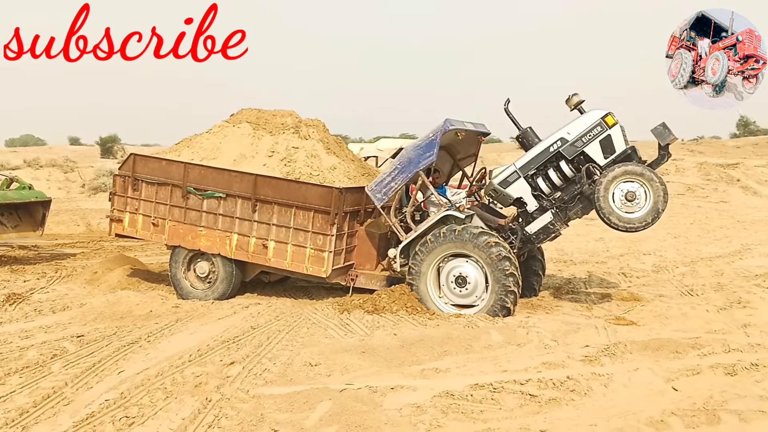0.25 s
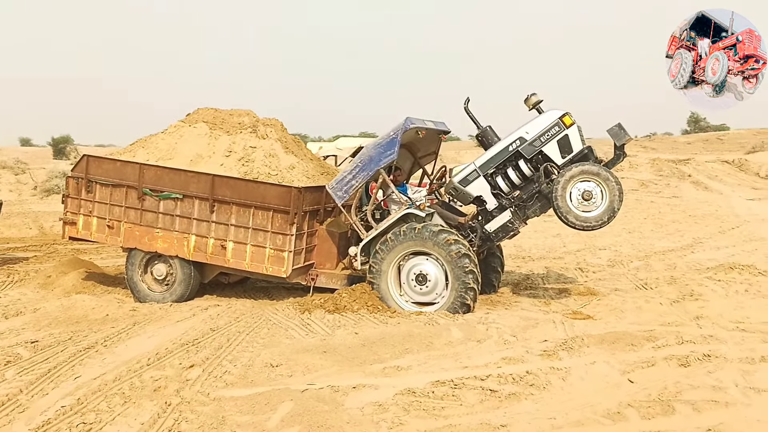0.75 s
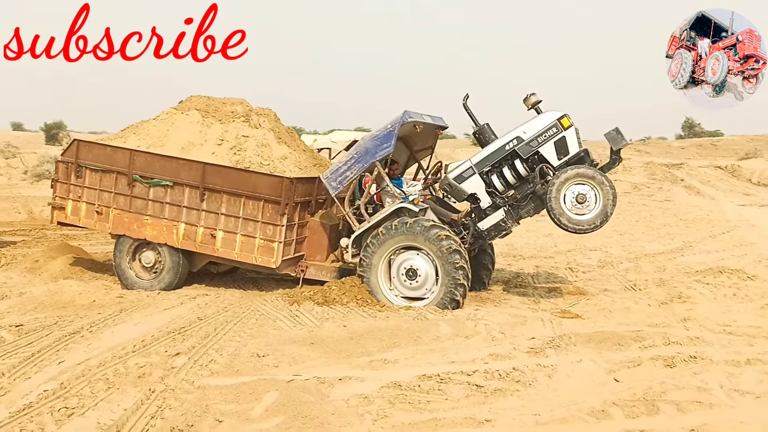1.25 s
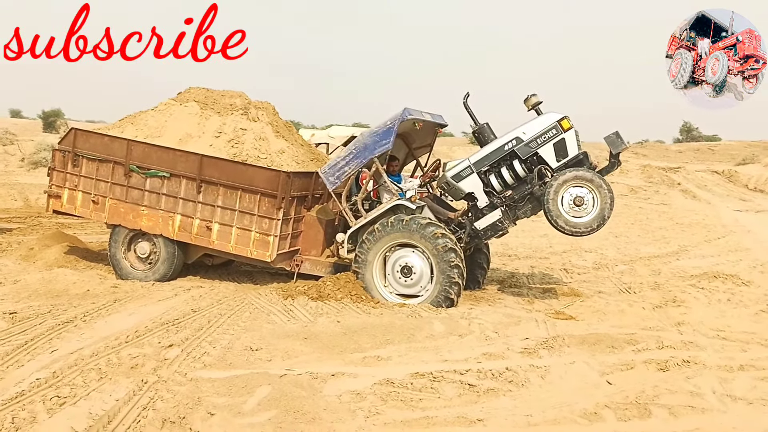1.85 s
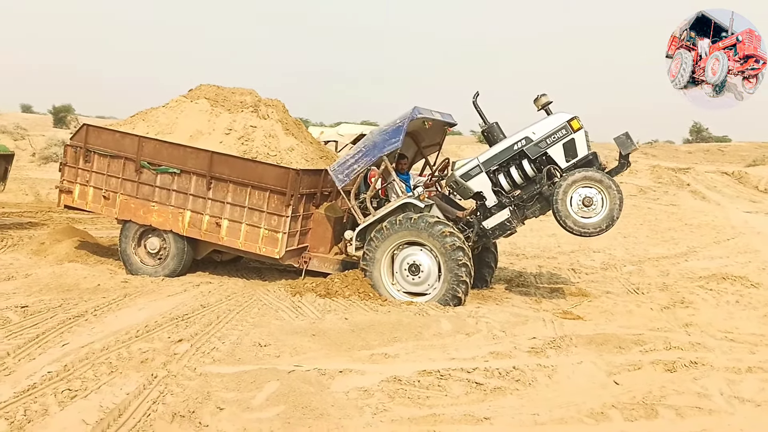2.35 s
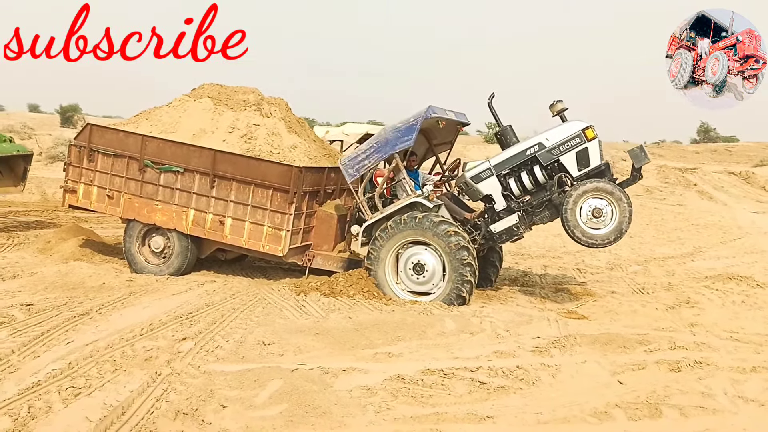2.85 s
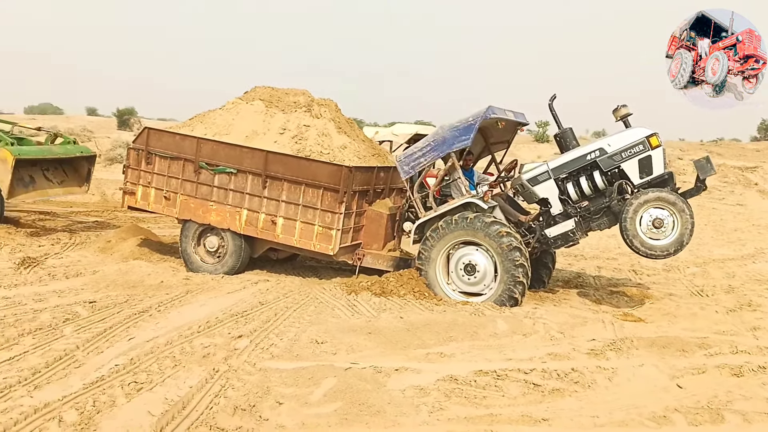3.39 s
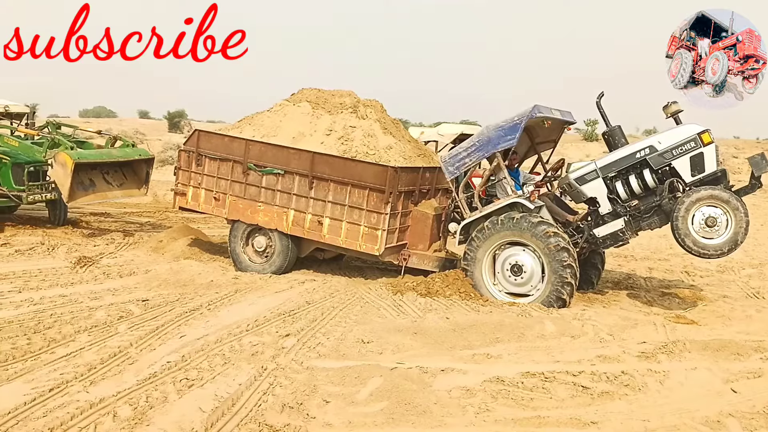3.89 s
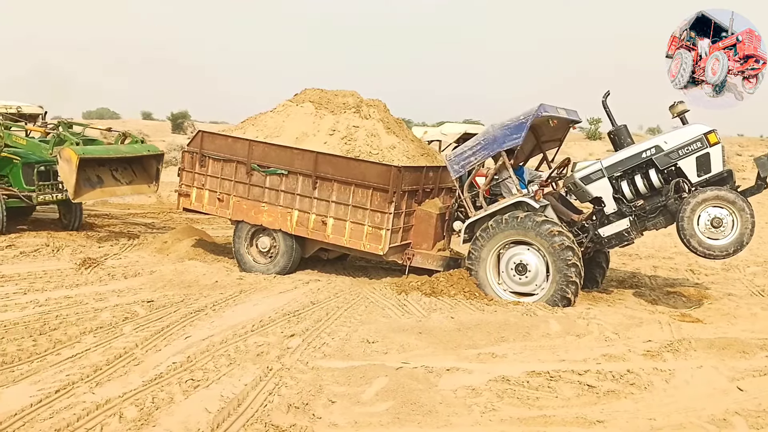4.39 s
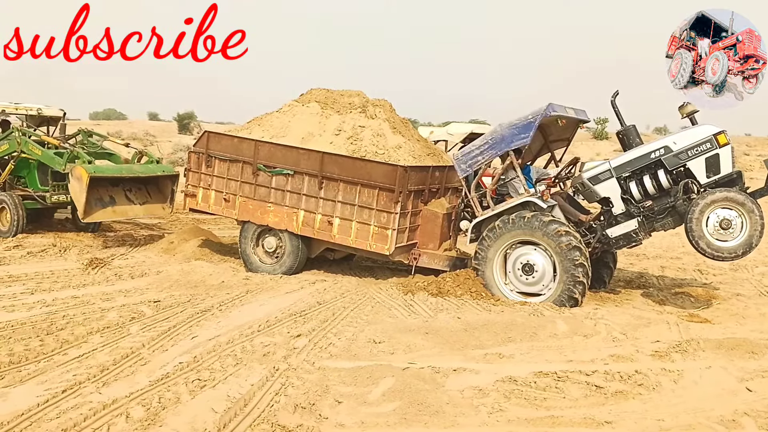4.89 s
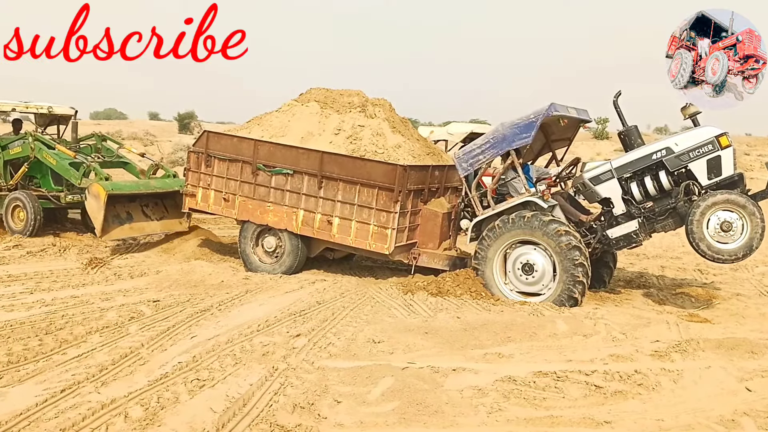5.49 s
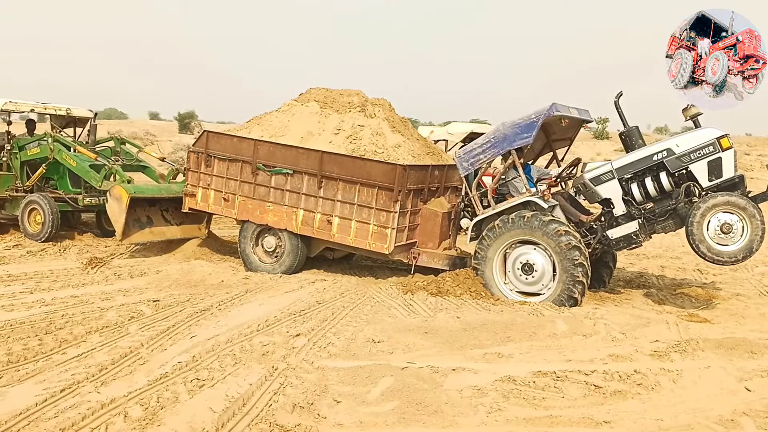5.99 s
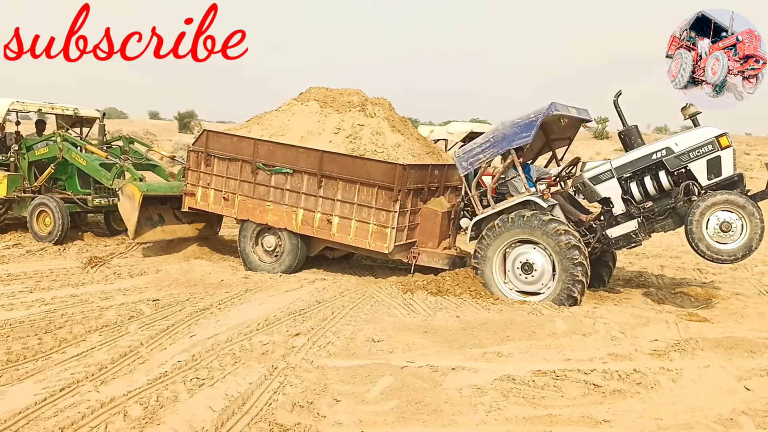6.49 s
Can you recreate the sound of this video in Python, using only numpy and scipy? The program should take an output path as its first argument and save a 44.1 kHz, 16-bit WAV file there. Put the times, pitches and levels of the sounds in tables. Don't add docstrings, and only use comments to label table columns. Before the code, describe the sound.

A diesel tractor hammers flat out in open sand, coasts down in a falling growl, then catches into a knocking idle while another engine drones.

```python
import sys
import numpy as np
from scipy import signal
from scipy.fft import rfft, irfft, next_fast_len
from scipy.io import wavfile
from scipy.ndimage import uniform_filter1d, map_coordinates

SR = 44100
rng = np.random.default_rng(int(sys.argv[2]) if len(sys.argv) > 2 else 0)


def nominal_scale(level):
    x = np.asarray(level, float) / 20
    return 10 ** x


def transcribe(u):
    v = np.clip(np.atleast_2d(u).T, -1, 1)
    q = np.round(v * 32767).astype(np.int16)
    wavfile.write(sys.argv[1], SR, q)


N = 297220
T = np.arange(N) / SR
PADDED = next_fast_len(N, True)
HZ = np.fft.rfftfreq(PADDED, 1 / SR)

# time in seconds, firings per second.
SPEED = [(0, 49.631), (0.35, 49.631), (0.7, 50.093), (1.05, 50.17), (1.42, 50.08), (1.6, 44.59),
         (2, 38.761), (2.4, 30.753), (2.72, 24.006), (2.85, 24.04), (3.15, 24.2), (3.52, 24.225),
         (4, 24.59), (4.3, 24.61), (4.6, 24.49), (4.87, 24.585), (5.4, 24.57), (6.74, 24.47)]
# time in seconds, main hum in Hz, effort in dB.
FAR = [(1.45, 68.8, -78), (1.55, 68.3, -50), (1.95, 66.5, -39), (2.25, 70.8, -37), (2.48, 80.7, -29.5),
       (2.7, 75.6, -42), (2.82, 73.5, -60), (3.6, 68.2, -57.5), (3.8, 67.7, -36), (3.95, 75, -36),
       (4.24, 93.05, -30.5), (4.6, 96.6, -35.5), (4.9, 98, -53), (5.25, 95.4, -36.5), (5.7, 94.45, -37),
       (6, 95.2, -32), (6.3, 96.5, -47), (6.74, 94.8, -40.5)]
# thirds of the main hum, level in dB.
FAR_ORDERS = [(3, 0)]
FAR_SIDE_ORDERS = [(2, 1), (4, -10), (5, 0), (6, -6)]
# frequency in Hz, density in dB per Hz.
WIND = [(15, -23), (40, -10), (70, -2.5), (120, -18), (200, -50)]
RUMBLE = [(15, -40), (25, -41), (81, -3.5), (176, -7.5), (234, -8), (365, -12.5), (440, -8.5), (511, -33),
          (560, -5), (730, -66), (1230, -120)]
ROAR_FAST = [(290, -16), (500, -22.5), (560, -9), (687, 1.5), (892, -5), (1340, -7), (1480, -7.5),
             (2070, -1.5), (2570, -12), (4450, -25), (7380, -22.5), (9310, -33.5), (10000, -30.5),
             (14800, -26), (15900, -40)]
ROAR_SLOW = [(170, -53), (290, -27), (500, -16), (842, 1), (1020, -9.5), (1210, -9), (1590, -12),
             (2010, -6), (3050, -20.5), (3960, -29.5), (6030, -27.5), (7820, -33), (9310, -39.5),
             (11100, -39), (14200, -30.5), (15900, -68)]
SLACK = [(420, -24), (520, -2.5), (600, 1.5), (730, -2.5), (830, -33.5)]
PIPE_BLOWN = [(110, -34), (140, -4), (156, -3.5), (175, -9), (210, -48.5)]
PUFF = [(4000, 1), (6800, 0.5), (8570, -8), (9740, -4.5), (11800, 1), (13000, -2), (14500, 4.5),
        (15400, 3.5), (15900, -20)]
CLATTER_FULL = [(310, -19), (540, -17), (692, -19), (753, -1), (911, -2), (1080, -13), (1330, -25),
                (1630, -36), (2030, -37), (2370, 2), (2570, -32), (3470, -23.5), (4510, -23.5),
                (6000, -0.5), (9000, -64), (11700, -58), (19800, -120)]
CLATTER_IDLE = [(620, -24), (1050, -63), (1190, -17), (1620, -6.5), (1770, 5), (2010, -3), (2770, -34),
                (4120, -40), (5150, -8), (6060, -3), (6690, -13), (9000, -17), (11700, -41), (19800, -120)]
HARSH = [(1100, -20), (1500, -12), (1900, -4), (2300, 0), (2700, -28), (3300, -35)]
# frequency in Hz, gain in dB.
ROAR_NOTCH = [(200, -8), (380, -5), (480, -1), (620, -7), (950, -7), (1300, 0), (2100, -1), (2800, 0)]
# frequency in Hz, gain in dB.
ROAR_NOTCH_FIRED = [(480, 0), (620, -3), (950, -3), (1300, -2.5), (2100, -3), (2600, 0)]
# time in seconds, peak in dB, pitch in Hz.
THUMPS = [(3.775, -28.5, 164), (3.98, -24.5, 146.4), (4.095, -21.5, 145), (4.201, -24, 157),
          (4.589, -32, 166.5), (4.901, -26, 159), (4.993, -28, 160), (5.451, -24.5, 180), (5.585, -21, 157),
          (5.826, -27.5, 160.4), (6.22, -24, 156), (6.324, -24, 200), (6.581, -25, 176),
          (6.662, -25, 174.4)]
# multiple of the four-stroke cycle, level in dB.
FULL_ORDERS = [(6, -37.1), (7, -51.6), (9, -37.9), (10, -39.7), (11, -46.6), (13, -49.7), (14, -50.0),
               (15, -40.8), (16, -46.3), (18, -47.1), (20, -52.3), (22, -51.4), (23, -49.4), (24, -50.8),
               (25, -44.6), (26, -51.6), (27, -48.5), (28, -46.8), (29, -51.9), (32, -52.2)]
IDLE_ORDERS = [(6, -2), (9, -2), (12, 3.5), (13, -7), (18, -8), (21, -11), (23, -14), (24, -17), (30, -17),
               (34, -16), (54, -14)]
# time in seconds, peak in dB, ring in Hz.
TICKS = [(3.4503, -31, 6100), (3.6134, -25, 6010), (3.8205, -25, 6130), (3.9018, -32, 5940),
         (3.9816, -29, 6200), (4.0235, -20, 5900), (4.0649, -23, 6160), (4.1457, -32, 6210),
         (4.1866, -27, 6070), (4.267, -23.5, 6320), (4.3887, -24, 6240), (4.4311, -17, 5860),
         (4.5538, -20, 5840), (4.6341, -25.5, 6240), (4.6765, -25, 5840), (4.9205, -17.5, 5740),
         (5.0003, -28, 6220), (5.0417, -21.5, 6130), (5.1649, -20, 6150), (5.2033, -32, 6140),
         (5.2866, -30, 6230), (5.3674, -23, 6140), (5.4084, -38, 6035), (5.6119, -24, 6160),
         (5.7331, -29.5, 5910), (5.8563, -22, 6190), (5.8982, -27, 6030), (6.02, -28, 6064),
         (6.0609, -20.5, 6180), (6.1013, -27, 6210), (6.1432, -27, 6180), (6.1846, -28, 6240),
         (6.224, -25, 6140), (6.2654, -19, 5890), (6.429, -25, 6140), (6.4684, -21.5, 6020),
         (6.5912, -24.5, 6200), (6.6331, -31, 6030), (6.671, -26, 5930), (6.7134, -24, 5860)]
# frequency and
# width in Hz, lag in ms, dB for cylinders 1, 2 and 3.
FULL_MODES = [(567, 28, -3.84, 1.5, 2.0, 1.5), (634, 114, 4.24, -22.0, 2.5, 1.5),
              (712, 42, -0.08, 7.0, 9.0, 4.5), (820, 68, -2.62, -22.0, 7.0, 0.5),
              (913, 28, -3.6, 0.5, 1.5, -2.0), (1158, 28, 2.42, 1.5, 7.5, 4.5),
              (1234, 190, 4.67, 6.5, 7.5, 6.5), (1386, 129, -1.75, -17.5, 1.0, 6.0),
              (1472, 34, 1.18, 3.0, 1.0, 5.0), (1566, 28, 0.82, 3.5, 7.0, -18.0),
              (1785, 28, -1.32, 9.5, 10.0, 10.0), (1908, 28, 2.02, -1.0, -0.5, 3.5),
              (1981, 105, -0.2, 13.5, 11.5, 13.5), (2072, 28, -1.95, 17.0, 10.0, 9.5),
              (2146, 70, 2.71, 9.5, 11.0, -18.5), (2192, 132, -0.23, 15.0, 6.5, 11.0),
              (2315, 28, 0.75, -18.5, -18.5, 4.5), (2338, 28, -0.31, 7.5, 8.5, 10.5),
              (2568, 28, 1.3, -5.0, 0.5, -1.0)]
IDLE_MODES = [(563, 28, 1.8, -9.5, -15.0, -10.0), (655, 141, 0.75, -18.0, -18.0, -20.0),
              (711, 28, 1.4, -18.5, -7.5, 3.0), (748, 32, -0.53, 0.5, -2.5, 0.0),
              (801, 28, 5.68, 2.0, -4.5, -15.0), (865, 28, 6.12, 0.0, -11.0, -1.5),
              (942, 28, 12.56, -5.0, -9.5, -5.0), (832, 200, 15.05, -4.5, -18.5, -3.5),
              (1161, 28, 3.24, -19.0, -7.0, -22.0), (1234, 28, -0.02, -6.5, -3.0, -6.5),
              (1409, 28, 2.73, -6.5, -8.5, -20.0), (1466, 28, 4.82, -22.0, -2.5, -10.0),
              (1640, 87, 6.63, -13.5, -7.0, -13.5), (1759, 28, 3.59, 0.5, -0.5, -6.5),
              (1881, 28, 5.02, -9.5, -0.5, -16.0), (1988, 130, 2.06, 2.0, 1.0, -1.5),
              (2063, 28, 3.9, -1.5, -6.0, 0.0), (2155, 28, 3.92, -7.5, -6.0, -11.0),
              (2261, 42, 5.2, -8.0, 0.0, -2.5), (2449, 28, -2.13, -11.5, -9.5, -10.0),
              (2558, 28, 3.59, -8.0, -9.0, -10.0), (5900, 200, 3, -14.0, -10.0, -15.0),
              (6200, 150, 4, -12.0, -8.0, -13.0)]
# frequency in Hz, left minus right in dB.
BALANCE = [(60, 2), (99, 3.5), (160, -0.5), (270, 2), (450, 2.5), (740, 1.5), (1220, 4), (2010, 9),
           (3330, 0.5), (5500, 3), (9080, 3.5), (15000, 6)]
# frequency in Hz, left-right correlation as a share.
SAME = [(40, 0.42), (120, 0.99), (300, 0.91), (750, 0.68), (1200, 0.044), (2500, 0.83), (4500, 0.14),
        (9000, 0.36), (15000, 0.09)]
# time in seconds, lead in samples.
LEAD = [(0, 3.4), (2.6, 1.6), (3.4, 5.92), (6.74, 5.67)]
# low edge in Hz, high edge in Hz, lost share in percent.
STARVED = [(3300, 4600, 15), (8100, 10900, 45), (10900, 13500, 1.5)]

FIRST_FIRING = .34
CUT_S, CUT_TAKES_S = 1.446, 0.048
RELIGHT_S, RELIGHT_TAKES_S = 2.72, 0.06
CLATTER_REPEATS, ROAR_REPEATS = .6, .5


def evened(x):
    return x / np.sqrt(np.mean(x ** 2) + 1e-20)


def read(points, hz):
    f, value = np.transpose(points)
    return np.interp(np.log(hz + 1), np.log(f + 1), value)


def curves(rows):
    s, *columns = np.transpose(rows)
    return [np.interp(T, s, c) for c in columns]


def ramp(start_s, takes_s):
    return np.clip((T - start_s) / takes_s, 0, 1)


def coloured(x, gain):
    return irfft(rfft(x, PADDED) * gain, PADDED)[..., :N]


def drift(rate_hz, t=T):
    steps = signal.lfilter([1], [1, -np.exp(-2 * np.pi * rate_hz / 100)], rng.standard_normal(800))
    settled = uniform_filter1d(steps, size=3)
    return np.interp(t * 100, np.arange(700), evened(settled)[100:])


def noise(points, gate=1, habit=0, share=0):
    drive = share * habit + np.sqrt(1 - share ** 2) * rng.standard_normal((2, N))
    return evened(coloured(gate * drive, nominal_scale(read(points, HZ))))


def hum(turns, orders, waver_db, waver_hz):
    coarse = T[::400]
    out = np.zeros(N)
    for k, db in orders:
        phase = rng.random()
        level = np.interp(T, coarse, nominal_scale(db + waver_db * drift(waver_hz, coarse)))
        out += level * np.cos(2 * np.pi * (k * turns + phase))
    return evened(out)


def damped(t, hz, width_hz, rise_ms):
    return np.sin(2 * np.pi * hz * t) * np.exp(-np.pi * width_hz * t) * (1 - np.exp(-t * 1000 / rise_ms))


def struck(rows, width_hz, rise_ms, rough):
    out, t = np.zeros(N + 3000), np.arange(3000) / SR
    for s, db, hz in rows:
        grit = 1 + rough * evened(uniform_filter1d(rng.standard_normal(len(t)), size=25))
        ring = damped(t, hz, width_hz, rise_ms)
        out[round(s * SR):][:len(t)] += nominal_scale(db) * grit * ring / abs(ring).max()
    return out[:N]


def firings():
    return np.cumsum(curves(SPEED)[0]) / SR - FIRST_FIRING


def throttle():
    cut, idle = ramp(CUT_S, CUT_TAKES_S), ramp(RELIGHT_S, RELIGHT_TAKES_S)
    speed = curves(SPEED)[0]
    return 1 - cut, cut - idle, idle, speed.max() - speed


def habit_of(fired):
    started = np.interp(np.floor(fired / 3) * 3, fired, np.arange(N))
    return rng.standard_normal((2, SR))[:, (np.arange(N) - np.round(started)).astype(int)]


def burst(fired, late, fall_db, spread_db):
    turn = fired - late
    size_db = spread_db * rng.standard_normal(int(fired[-1]) + 3)
    gate_db = size_db[np.floor(turn).astype(int) + 2] - fall_db * (turn % 1)
    return uniform_filter1d(nominal_scale(gate_db), size=130)


def wind():
    gust_s, rise_s, fall_s = 2, 0.12, 0.19
    gust = np.exp(-((T - gust_s) / np.where(T < gust_s, rise_s, fall_s)) ** 2)
    return (nominal_scale(-62) + nominal_scale(-58) * gust) * noise(WIND, nominal_scale(2.1 * drift(4)))


def buffets():
    return nominal_scale(-4) * struck(THUMPS, width_hz=21, rise_ms=8, rough=0)


def far_tractor():
    hz, db = curves(FAR)
    turns = np.cumsum(hz) / SR / 3
    side_db = -5 - 1.5 * np.maximum(90 - hz, 0)
    main = hum(turns, FAR_ORDERS, waver_db=3.2, waver_hz=10.0)
    side = hum(turns, FAR_SIDE_ORDERS, waver_db=3.5, waver_hz=7.0)
    return nominal_scale(db) * (main + nominal_scale(side_db) * side)


def ground_rumble():
    full, coast, idle, _ = throttle()
    speed, (far_hz, far_db) = curves(SPEED)[0], curves(FAR)
    coast_db = -30 - 2 * np.maximum(34.9 - speed, 0)
    idle_db = -45 + 6 * ramp(RELIGHT_S, 1.1)
    churn_db = -35 - 3 * np.maximum(70.6 - far_hz, 0) - np.maximum(-54.5 - far_db, 0)
    level = full * nominal_scale(-39) + coast * nominal_scale(coast_db) + idle * np.hypot(nominal_scale(idle_db), nominal_scale(churn_db))
    level += nominal_scale(-46) * np.exp(-((T - 3.05) / 0.078) ** 2)
    return level * noise(RUMBLE, nominal_scale(1.6 * drift(9)))


def roar():
    _, coast, idle, lost_hz = throttle()
    fired = firings()
    habit = habit_of(fired)
    fast = np.clip((curves(SPEED)[0] - 25) / 12, 0, 1)
    out = np.sqrt(fast) * noise(ROAR_FAST, 1, habit, ROAR_REPEATS)
    out += np.sqrt(1 - fast) * noise(ROAR_SLOW, 1, habit, ROAR_REPEATS)
    out = coloured(out, nominal_scale(read(ROAR_NOTCH, HZ)))
    out = coast * out + (1 - coast) * coloured(out, nominal_scale(read(ROAR_NOTCH_FIRED, HZ)))
    throb = burst(fired, late=.06, fall_db=3.5, spread_db=.5)
    level_db = (1 - idle) * (-19.5 - 0.39 * lost_hz) + idle * -21.5
    return nominal_scale(level_db + 3.0) * out * (1 - idle + idle * evened(throb))


def driveline_slack():
    fade_s = 0.8
    return throttle()[1] * nominal_scale(-29.5) * np.exp(-np.maximum(T - CUT_S, 0) / fade_s) * noise(SLACK)


def exhaust(fired):
    _, coast, _, lost_hz = throttle()
    full_gain = nominal_scale(-31.5 - 47 * np.maximum(T - CUT_S, 0))
    idle_gain = ramp(RELIGHT_S, 0.55) * nominal_scale(-37.5)
    pump_gain = coast * nominal_scale(-34 - lost_hz - 0.5 * np.maximum(lost_hz - 9.1, 0))
    pipe = full_gain * hum(fired / 3, FULL_ORDERS, waver_db=0.8, waver_hz=8.4)
    pipe += idle_gain * hum(fired / 3, IDLE_ORDERS, waver_db=2.5, waver_hz=3)
    pipe += pump_gain * np.cos(2 * np.pi * fired)
    return pipe + coast * nominal_scale(-38.5) * noise(PIPE_BLOWN)[0]


def valve_puffs(fired):
    _, _, idle, lost_hz = throttle()
    burning = .8 * idle
    opening = burst(fired - .14 * burning, late=-.08, fall_db=18, spread_db=1.6)
    closing = burning * nominal_scale(-2) * burst(fired, late=.56, fall_db=26, spread_db=2.5)
    cut = ramp(CUT_S, 0.11)
    unloaded_db = (-33 + 0.05 * lost_hz) * (1 - idle) - 36.5 * idle
    return nominal_scale(-41.5 * (1 - cut) + cut * unloaded_db) * noise(PUFF, opening + closing)


def injector_ticks():
    return nominal_scale(-3) * struck(TICKS, width_hz=60, rise_ms=1.6, rough=.5)


def knock(fired, modes, jitter_ms, spread_db, rise_ms, span):
    first, last = (int(s * SR) for s in span)
    number = np.arange(np.ceil(fired[first]), fired[last - 1] - .5).astype(int)
    at = np.interp(number, fired, T) - span[0]
    t = np.arange(2600) / SR
    out = np.zeros((2, N))
    for hz, width_hz, lag_ms, *db in modes:
        chance = rng.standard_normal((len(number), 4)).T
        place = np.round((at + (lag_ms + jitter_ms * chance[:2]) / 1000) * SR).astype(int)
        strength = nominal_scale(np.array(db)[number % 3] + spread_db * chance[2:])
        blows = np.zeros((2, last - first))
        np.put_along_axis(blows, place, strength, axis=1)
        ring = evened(damped(t, hz, width_hz, rise_ms))
        out[:, first:last] += signal.oaconvolve(blows, ring[None], axes=1)[:, :last - first]
    return out / np.std(out[:, first:last])


def full_knock(fired, habit):
    out = nominal_scale(6) * knock(fired, FULL_MODES, jitter_ms=.025, spread_db=1.6, rise_ms=1., span=(0, 3))
    gate = burst(fired, late=0.02, fall_db=6, spread_db=1.5)
    out += nominal_scale(-8) * noise(CLATTER_FULL, gate, habit, CLATTER_REPEATS)
    return nominal_scale(-26.5 - 6 * (1 - throttle()[0]) - 8 * np.maximum(T - CUT_S, 0)) * out


def idle_knock(fired, habit):
    out = nominal_scale(3.2) * knock(fired, IDLE_MODES, jitter_ms=.03, spread_db=2, rise_ms=1.5, span=(2.6, N / SR))
    gate = burst(fired, late=0.06, fall_db=17, spread_db=2)
    out += nominal_scale(-9) * noise(CLATTER_IDLE, gate, habit, CLATTER_REPEATS)
    cold = nominal_scale(2) * np.exp(-np.maximum(T - RELIGHT_S - .07, 0) / .16)
    out += cold * noise(HARSH, burst(fired, late=0.046, fall_db=9, spread_db=0.5))
    kick_db = 1.5 * np.exp(-np.maximum(T - RELIGHT_S, 0) / 0.32)
    level_db = -28.5 - 10 * (1 - throttle()[2]) + kick_db
    return ramp(RELIGHT_S - .04, 0.027) * nominal_scale(level_db) * out


def engine():
    fired = firings()
    habit = habit_of(fired)
    knocks = full_knock(fired, habit) + idle_knock(fired, habit)
    return knocks + valve_puffs(fired) + exhaust(fired) + injector_ticks()


def scene():
    background = wind() + buffets() + far_tractor() + ground_rumble()
    direct, other = background + roar() + driveline_slack() + engine()
    same = np.clip(read(SAME, HZ), 0, 1)
    duller = nominal_scale(-read(BALANCE, HZ))
    right = coloured(direct, same * duller) + coloured(other, np.sqrt(1 - same ** 2) * duller)
    right = map_coordinates(right, [np.arange(N) - curves(LEAD)[0]], order=2, mode="nearest")
    return np.array([direct, right])


def top_cut(x):
    return signal.sosfilt(signal.butter(12, 15890, fs=SR, output="sos"), x)


def record(dry):
    hz, _, z = signal.stft(dry, SR, nperseg=2048, noverlap=1024)
    bands = z[:, :1024].reshape(2, 64, 16, -1)
    band_hz = hz[8:1024:16]
    power = uniform_filter1d((abs(bands) ** 2).sum(axis=(0, 2)), size=2, axis=1)
    power = power / uniform_filter1d(power.sum(axis=0), size=9) ** .72
    wander = uniform_filter1d(rng.standard_normal(power.shape), size=3, axis=1)
    power = power * nominal_scale(9 * uniform_filter1d(wander, size=2, axis=0))
    for low_hz, high_hz, share in STARVED:
        inside = (band_hz > low_hz) & (band_hz < high_hz)
        faint = inside[:, None] & (power < np.percentile(power[inside], share))
        bands = bands * ~faint[None, :, None]
    z = np.concatenate([bands.reshape(2, 1024, -1), z[:, 1024:]], axis=1)
    mix = signal.istft(z, SR, nperseg=2048, noverlap=1024)[1][:, :N]
    return top_cut(mix)


dry = scene()
out = record(dry)
transcribe(out)
```